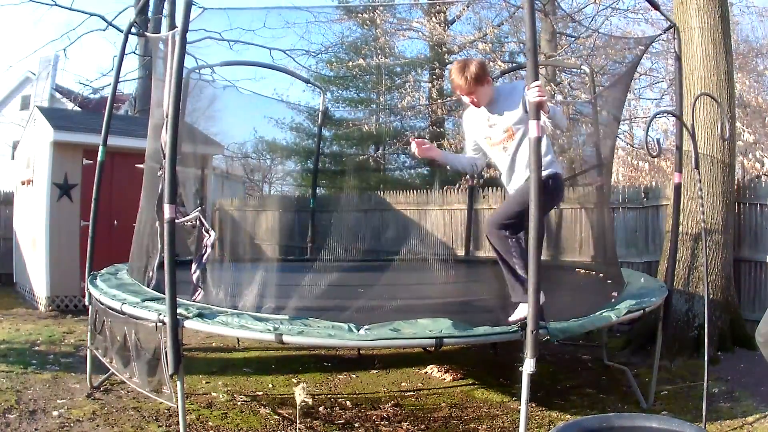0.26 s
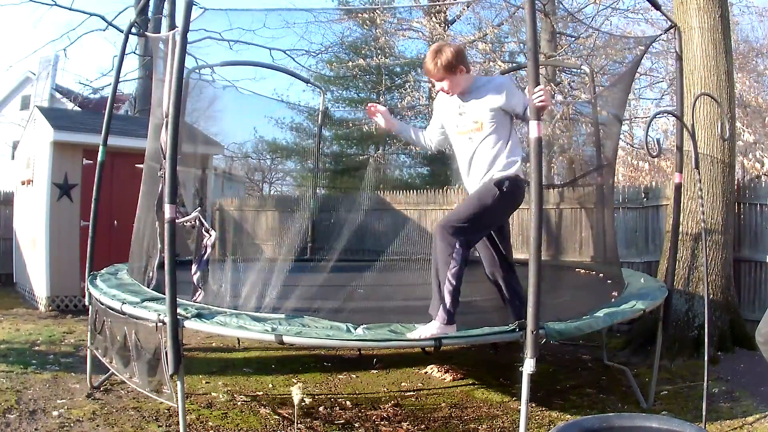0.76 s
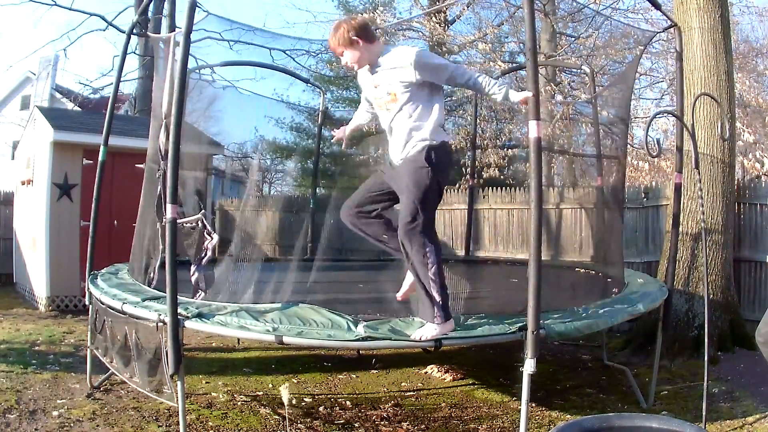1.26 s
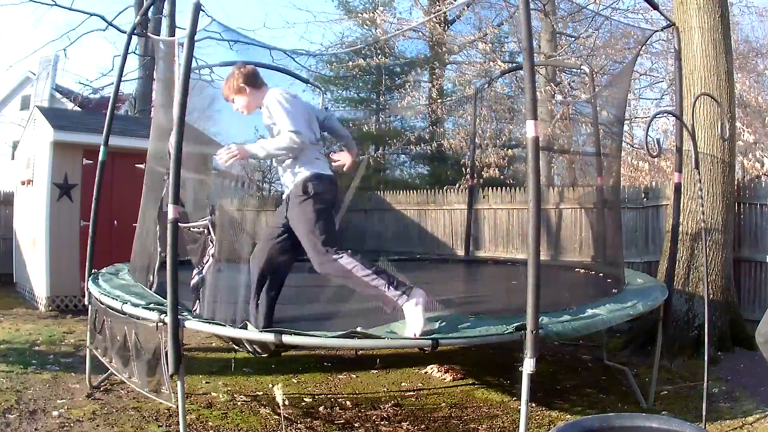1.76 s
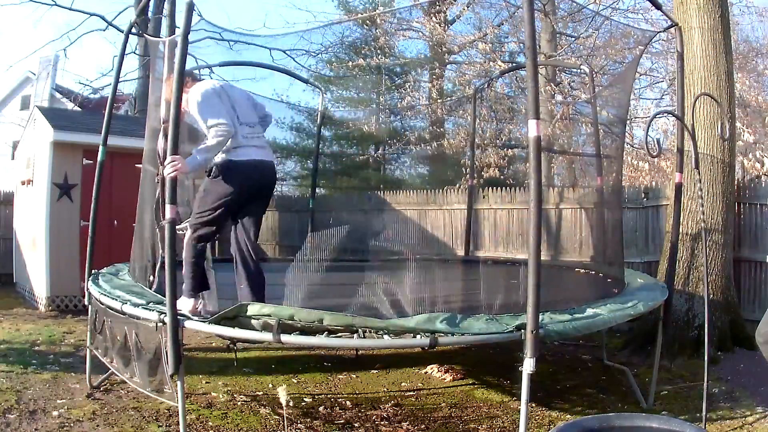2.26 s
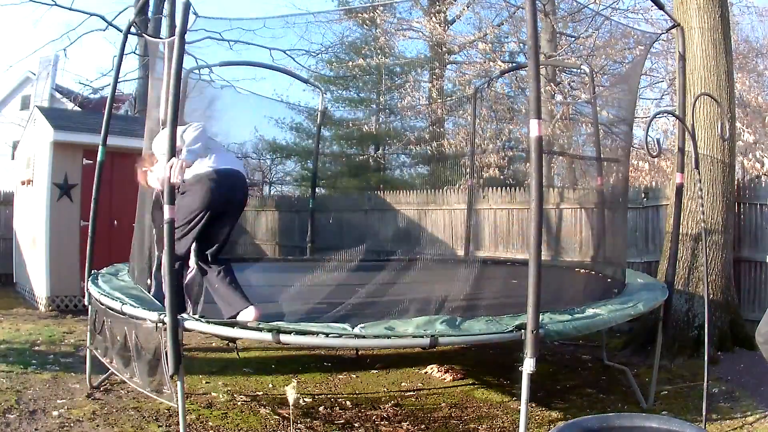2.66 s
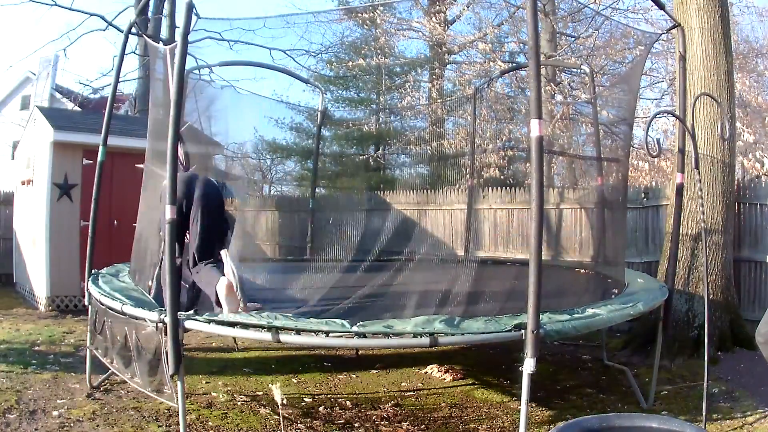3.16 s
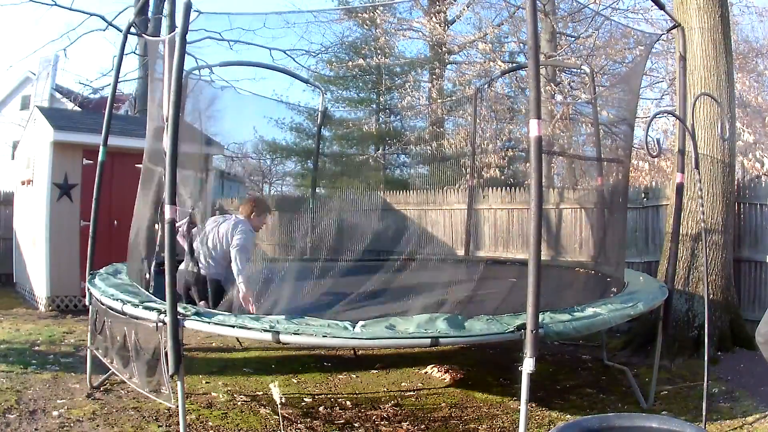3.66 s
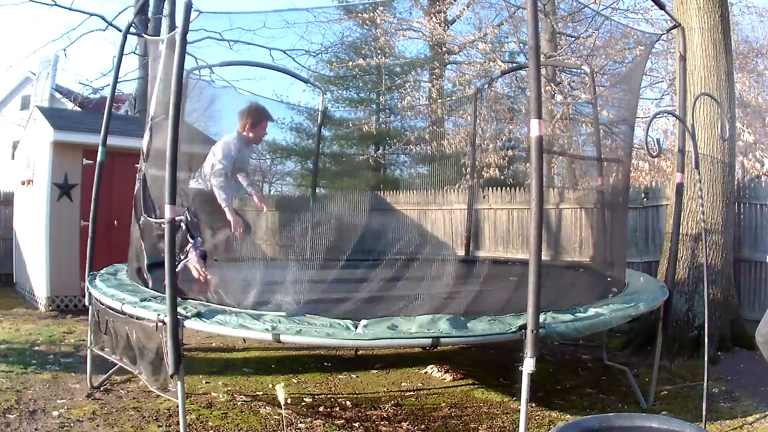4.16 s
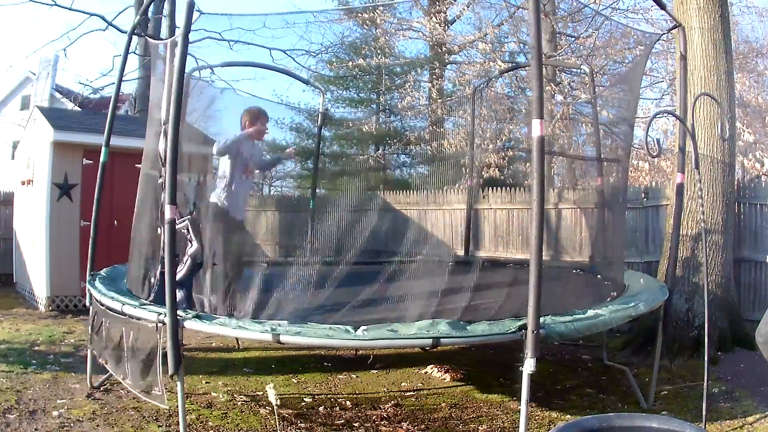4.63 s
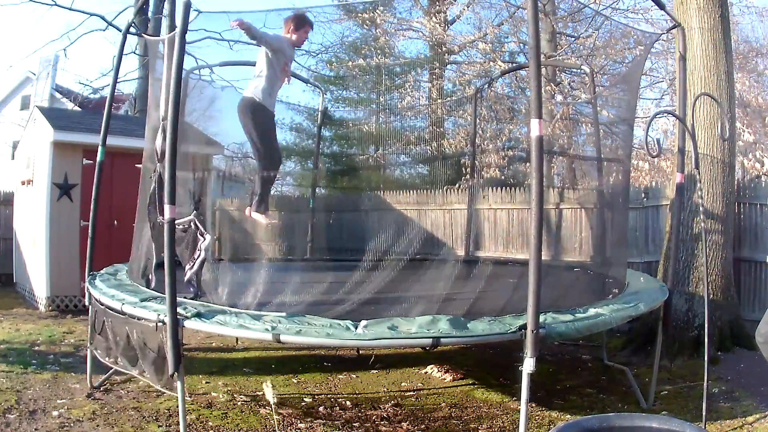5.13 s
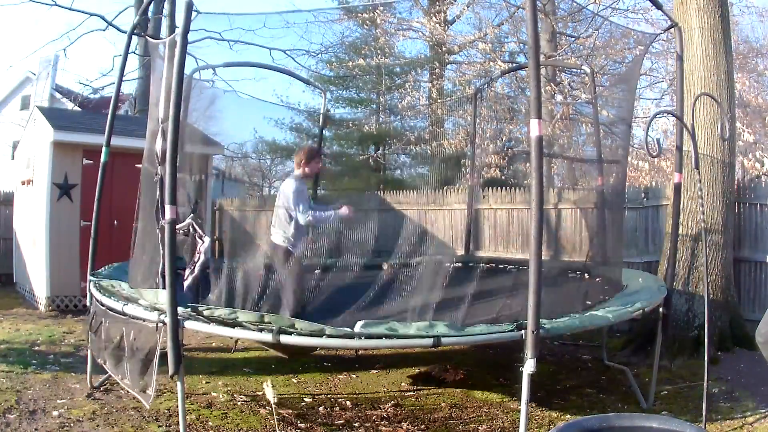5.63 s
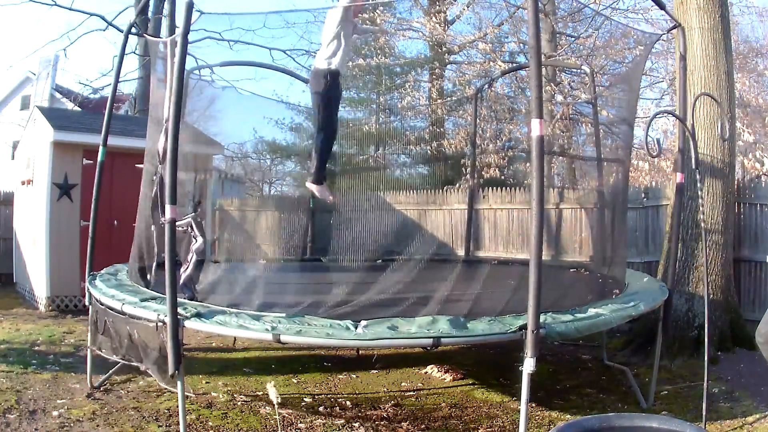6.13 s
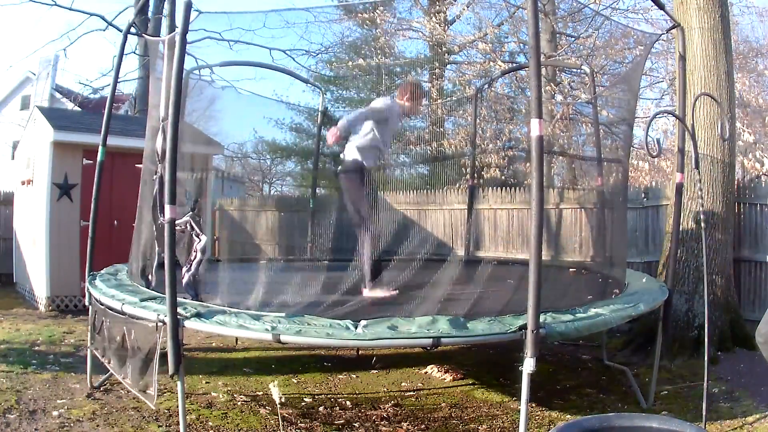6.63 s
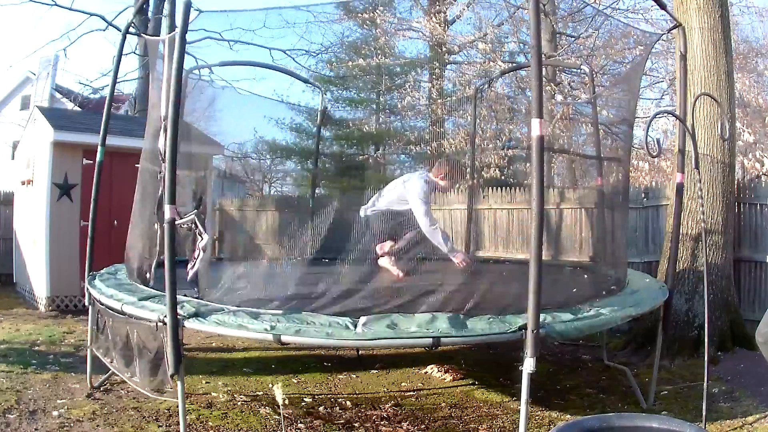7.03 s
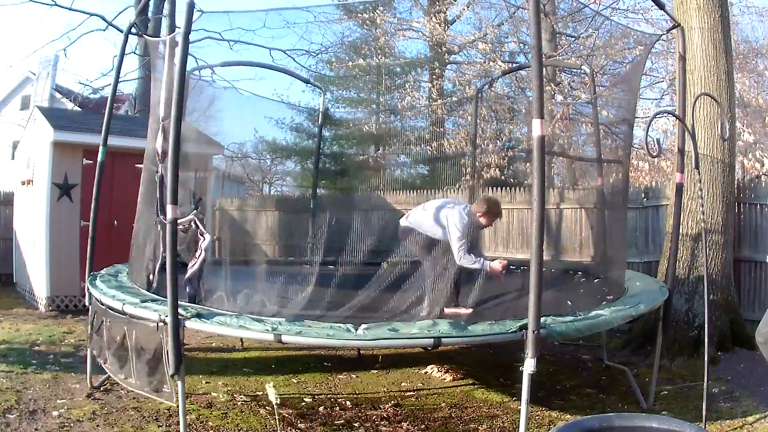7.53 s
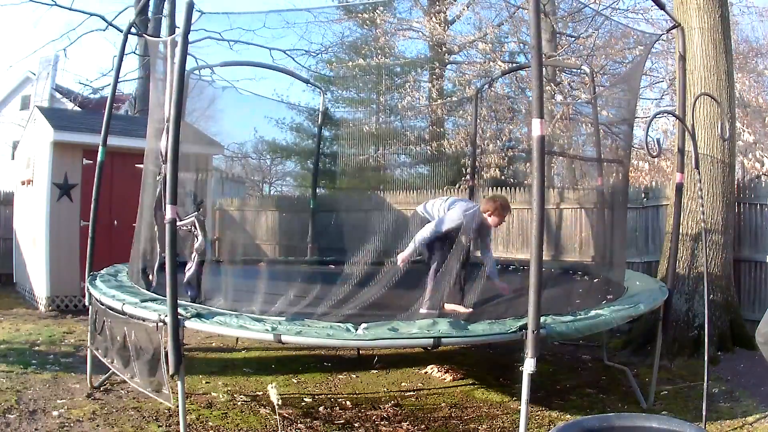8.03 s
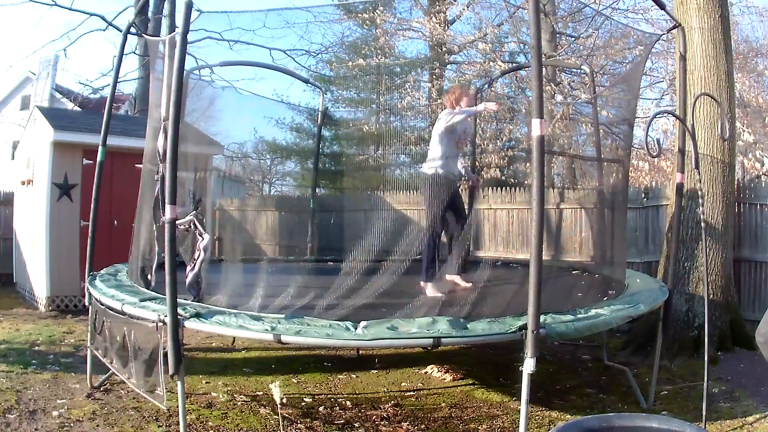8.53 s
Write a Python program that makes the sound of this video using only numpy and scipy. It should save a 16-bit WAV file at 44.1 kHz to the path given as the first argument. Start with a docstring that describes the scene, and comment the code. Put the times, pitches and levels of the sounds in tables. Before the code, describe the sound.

Steel hooks scrape, tick and crack on a trampoline outdoors, heard in mono from a few metres away. Sparse, thin creaking comes first, then a ringing tube knock with a cluster of snaps, further tugs, and rhythmic bouncing with raspy springs, tiny squeaks and muffled mat booms. Short pauses separate the bounces. Near the end there is only faint creaking and a couple of small clicks over quiet air and scattered echoes.

```python
"""Spring hooks grind, snap and squeak on a backyard trampoline: someone steps along the rim, climbs in and bounces.
Uneven trains of short noise ticks make the grinding; cracks with chatter make the snaps, gliding harmonics the squeaks.
Sine tones make the knocks of the steel tubes and, with a puff of filtered noise, the soft thumps of the mat.
Fence and shed throw short echoes, made of scattered clicks, over a quiet outdoor hush of filtered noise, all in mono."""
import sys
import numpy as np
from scipy import signal
from scipy.fft import rfft, irfft, next_fast_len
from scipy.io import wavfile
from scipy.ndimage import uniform_filter1d

SR = 44100
rng = np.random.default_rng(int(sys.argv[2]) if len(sys.argv) > 2 else 0)


def transcribe(u):
    """Save the signal u as a 16-bit wav file named by the first command-line argument.

    u: samples, shape (n,) or (channels, n), limited to [-1, 1]; the rate is SR.
    q: integer samples, one column per channel.
    """
    v = np.clip(np.atleast_2d(u).T, -1, 1)
    q = np.round(v * 32767).astype(np.int16)
    wavfile.write(sys.argv[1], SR, q)


N = 387638  # length of the scene [samples]

# Colour of steel rubbing on steel: (frequency [Hz], relative level [dB])
RUBBING_COLOUR = [(100, -45), (300, -32), (650, -27.5), (900, -16), (1250, -9), (1600, 1.5), (2100, 2.5),
                  (2800, -0.5), (3400, -1), (4300, 0), (5300, -4.5), (6600, -1), (7400, -8), (8500, -4),
                  (9500, -0.5)]
PATCH_DB = 1.8  # spread of the wandering resonances [dB]


def amp(db):
    """Turns decibels into a gain."""
    return 10 ** (np.asarray(db) / 20)


def evened(x):
    """Scales a signal to an average strength (rms) of 1."""
    return x / np.sqrt(np.mean(x ** 2) + 1e-20)


def read(points, hz):
    """Reads a table between its points, along a logarithmic frequency axis."""
    f, value = np.transpose(points)
    return np.interp(np.log(hz + 1), np.log(f + 1), value)


def add(mix, s, sound):
    """Mixes a sound in, starting at a time in seconds."""
    part = mix[max(round(s * SR), 0):][:len(sound)]
    part += sound[:len(part)]


def colour(x, points):
    """Makes some frequencies louder or softer, as a table of levels says."""
    size = next_fast_len(len(x) + 1024)
    gain = amp(read(points, np.fft.rfftfreq(size, 1 / SR)))
    return irfft(rfft(x, size) * gain, size)[:len(x)]


def halves(x):
    """Splits a sound at 3800 Hz into its middle, with all that lies below, and its treble."""
    low_pass = signal.butter(6, 3800, fs=SR, output="sos")
    middle = signal.sosfiltfilt(low_pass, x)
    return middle, x - middle


def drift(per_s, size=N):
    """Wanders at random around 0: straight lines join per_s random values a second."""
    knots = rng.standard_normal(8192)
    return np.interp(np.arange(size) / SR * per_s, np.arange(len(knots)), knots)


def patchy(x, depth_db):
    """The resonances of the moving coils wander: patches some 200 Hz wide and 40 ms long."""
    z = signal.stft(x, nperseg=512, noverlap=384)[2]
    field = uniform_filter1d(rng.standard_normal(z.shape), size=3, axis=0)  # smooth over frequency
    field = evened(uniform_filter1d(field, size=16, axis=1))  # smooth over time
    return signal.istft(z * amp(depth_db * field), nperseg=512, noverlap=384)[1][:len(x)]


def hush(early_db=-50, late_db=-49.0, waver_db=1.0):
    """Far rumble and airy hiss of the neighbourhood: coloured noise whose level wavers."""
    # Colour of the quiet outdoors: (frequency [Hz], relative level [dB per Hz])
    hush_colour = [(12, -21.5), (22, 2.5), (110, -3.5), (170, -10.5), (300, -14.5), (520, -17.5),
                   (1050, -12.5), (1700, -7), (2500, -15), (4500, -21.5), (6500, -15.5), (7500, -20),
                   (8600, -10.5), (9500, -18)]
    air = evened(colour(rng.standard_normal(N), hush_colour))
    level_db = np.linspace(early_db, late_db, N) + waver_db * drift(26)
    return air * amp(level_db)


def yard(x, wet_db=-11, build_s=0.004):
    """Ground, fence, shed and trees throw scattered echoes that die away at a different speed in each pitch range."""
    # How long the echoes last: (frequency [Hz], time to fall by 60 dB [s])
    echo_times = [(200, 0.12), (2000, 0.97), (9000, 0.53)]
    # about 2500 echoes a second at random moments, with random sign
    taps = rng.choice([-1., 1.], SR // 2) * (rng.random(SR // 2) < 2500 / SR)
    hz, t, z = signal.stft(taps, SR, nperseg=256)
    fading = amp(-60 * t / read(echo_times, hz)[:, None])
    build_up = np.minimum(t / build_s, 1)
    tail = signal.istft(z * fading * build_up, SR, nperseg=256)[1]
    echoes = signal.oaconvolve(x, tail / np.linalg.norm(tail))[:N]
    return x + amp(wet_db) * echoes


def mat(rise_s=0.012, cloth_t60=0.65, sway=.08):
    """The stretched mat booms softly, its pitch swaying with the tension; its cloth gives a dull puff."""
    # The mat takes the weight, higher in pitch near the rim: (time [s], level [dB], pitch [Hz],
    # time for the boom to fall by 60 dB [s], cloth puff relative to the boom [dB])
    thumps = [(1.9, -61, 114, 0.31, 8), (2.119, -47.5, 113, 0.7, -20), (3.061, -48, 112, 0.34, -19),
              (3.82, -46.5, 106.3, 0.44, -15), (4.898, -49, 110, 0.46, -20), (5.817, -38, 78, 0.76, -12),
              (7.05, -36.5, 82.2, 1, -10)]
    # Ways the mat swings, like a drum skin: (multiple of the pitch, level [dB])
    drum_modes = [(1, -5), (.77, -11.5), (1.44, -15)]
    # frequency [Hz], relative level [dB]
    cloth_colour = [(30, -30), (90, -10), (250, -12.5), (600, -5), (1000, -4.0), (2500, -27.5)]
    t, out = np.arange(SR) / SR, np.zeros(N)
    for s, db, hz, t60, cloth_db in thumps:
        turns = hz * np.cumsum(1 + sway * drift(25, SR)) / SR
        drum = sum(amp(mode_db) * np.sin(2 * np.pi * (k * turns + rng.random())) for k, mode_db in drum_modes)
        puff = evened(colour(rng.standard_normal(SR), cloth_colour))
        boom = drum * amp(-60 * t / t60)
        cloth = puff * amp(cloth_db - 60 * t / cloth_t60)
        add(out, s, amp(db) * np.minimum(t / rise_s, 1) * (boom + cloth))
    return out


def knocks(rise_s=.001):
    """A tube shifts in its joint with a blip of a few cycles, or rings briefly when free."""
    # The steel tubes knock: (time [s], level [dB], pitch [Hz], time to fall by 60 dB [s])
    tube_knocks = [(1.902, -26.5, 2190, 0.18), (1.912, -29, 2346, 0.14), (1.915, -29, 6000, 0.17),
                   (4.036, -18, 1930, 0.016), (5.8623, -12, 1700, 0.008)]
    t, out = np.arange(SR // 3) / SR, np.zeros(N)
    for s, db, hz, t60 in tube_knocks:
        shape = np.minimum(t / rise_s, amp(-60 * (t - rise_s) / t60))
        add(out, s, amp(db) * shape * np.sin(2 * np.pi * hz * t))
    return out


def steel(x):
    """The coils and frame ring on faintly after every slip, each resonance as a fading tone."""
    # Resonances of coils and frame: (pitch [Hz], relative level [dB], time to fall by 60 dB [s])
    resonances = [(1383, -4, .1), (1604, -3, .08), (2180, -2, .1), (2878, -5, .07), (3387, -4, .08),
                  (3600, -4, .07), (3836, -4, .07), (4280, -3, .09), (4767, -4, .14), (5383, -4, .06),
                  (6000, -4, .1), (6500, -2, .08), (7425, -3, .18), (8980, -3, .1), (9455, -2, .1)]
    t = np.arange(SR // 2) / SR
    ring = sum(amp(db - 60 * t / t60) * np.sin(2 * np.pi * hz * t) for hz, db, t60 in resonances)
    ringing = signal.oaconvolve(x, ring / np.linalg.norm(ring))[:N]
    return x + amp(-15) * ringing


def squeaks(grind, radiate_hz=1300, shimmer_db=3):
    """Even slipping takes over from the grinding, dipped to half, as a short gliding stack of harmonics."""
    # A hook slips evenly and sings: (time [s], length [s], first pitch [Hz], last pitch [Hz],
    # level [dB], overtone slope [dB per octave], pitch roughness [share of the pitch])
    songs = [(0.271, 0.076, 1800, 1898, -46, -22, .11), (2.532, 0.027, 1630, 1700, -41, -25, .04),
             (4.63, 0.042, 679, 728, -31.5, 0, 0.016), (4.675, 0.049, 711, 724, -35.5, 0, 0.02),
             (4.696, 0.028, 1124, 1077, -34.5, -13.5, 0.057), (4.834, 0.031, 1360, 1633, -35, -5.5, 0.071),
             (4.87, 0.032, 1950, 1940, -36, -8, 0.055), (5.674, 0.036, 1990, 1920, -40.5, -6.5, 0.028),
             (5.924, 0.015, 1427, 1470, -29.5, -6, 0.023)]
    out, singing = np.zeros(N), np.zeros(N)
    for s, length, first_hz, last_hz, db, slope_db, rough in songs:
        size = int(length * SR)
        hz = np.linspace(first_hz, last_hz, size) * (1 + rough * drift(700, size))
        turns = np.cumsum(hz) / SR
        k = np.arange(1, 9)[:, None]  # harmonic numbers
        sloped = amp(read(RUBBING_COLOUR, k * hz) + slope_db * np.log2(k))
        # thin steel hardly radiates the low harmonics
        weight = sloped / (1 + (radiate_hz / (k * hz)) ** 6)
        stack = (weight * np.sin(2 * np.pi * (k * turns + rng.random(k.shape)))).sum(0)
        grip = amp(shimmer_db * drift(400, size))
        swell = signal.windows.tukey(size, .5)
        add(out, s, amp(db) * evened(stack * grip) * swell)
        add(singing, s, swell)
    return out + grind * (1 - np.minimum(singing, 1) / 2)


def snaps(grain_db=1.5, crack_db=10, crack_t60=0.04, coil_t60=.085, rise_s=.0024, level_db=-12):
    """A hook jumps in its seat: a bright crack, then the coil chatters to rest."""
    # Each jump: (time of the middle of the rise [s], level before level_db is added [dB],
    # loudness of the crack before crack_db is added [dB])
    jumps = [(0.1952, -31, 11), (.609, -26.5, -32), (.6387, -20, -34), (1.1747, -27, -3),
             (1.3547, -20.5, -2.5), (1.4827, -21, -5), (1.519, -33, 8), (1.668, -32, 15),
             (1.7518, -21, 4.5), (1.7904, -22.5, 8), (1.9, -10, -6.5), (1.9126, -13.5, 3.5),
             (2.0248, -14, -30), (2.0403, -22, -28), (2.068, -15.5, -35), (2.1128, -13, -7),
             (2.172, -19.5, -1.5), (2.6623, -12.5, -15), (2.6985, -17, -3), (3.0184, -17.5, -9),
             (3.1416, -17.5, -29), (3.3688, -15.5, 2), (3.881, -15.5, -8.5), (4.357, -16.5, -12),
             (4.4252, -17.5, -1.5), (4.4688, -16.5, -5.5), (5.1047, -22, -6), (5.174, -25, 7.5),
             (5.648, -28.5, -7), (6.1665, -22, 5.5), (6.2135, -25, 5), (6.6671, -22, -28),
             (7.0762, -6.5, -21), (7.1186, -20, 2), (7.4851, -13, -26), (8.5417, -29, -29),
             (8.7068, -17, -5)]
    # Colour of a hook's first jump: (frequency [Hz], relative level [dB])
    crack_colour = [(300, -44), (1500, -25), (3000, -10.5), (6000, 0), (7500, 0.5), (8600, 8.5),
                    (9500, 5.5)]
    t, out = np.arange(SR // 3) / SR, np.zeros(N)
    for s, db, bright_db in jumps:
        grain = amp(grain_db * drift(1200, len(t)))
        chatter = patchy(rng.standard_normal(len(t)), PATCH_DB) * grain
        coil = evened(colour(chatter, RUBBING_COLOUR)) * amp(-60 * t / coil_t60)
        crack = evened(colour(chatter, crack_colour)) * amp(bright_db + crack_db - 60 * t / crack_t60)
        rise = np.minimum(t / rise_s, 1)
        add(out, s - rise_s / 2, amp(db + level_db) * rise * (coil + crack))
    return out


def pulls(recoil_rise_s=0.042, recoil_hold_s=0.031, rebound_s=0.27):
    """Lists every pull on the springs: a bounce is stretch, recoil and rebound; a tug is one pull."""
    # A step or a shift of weight tugs at a few springs: (time [s], rise [s], hold [s],
    # relative grinding level [dB], treble relative to it [dB])
    tugs = [(0.0, 0.0039, 0.028, -48, 3), (.195, 0.013, 0.07, -47.5, 11), (.26, 0.037, .05, -46.5, -2),
            (.7, 0.033, 0.55, -57.5, 8), (1.155, 0.018, 0.022, -40.5, 10.5), (1.33, 0.019, .02, -42.5, 4),
            (1.42, 0.064, 0.0075, -47, 16), (1.65, 0.0086, 0.05, -47, 10), (1.8, 0.036, 0.044, -43, 4.5),
            (1.9, 0.011, .006, -29.5, 1), (2.02, 0.0072, 0.018, -39.5, 1), (2.12, 0.058, 0.031, -41.5, 8),
            (2.46, 0.051, 0.032, -43, 10), (2.58, .03, .05, -46.5, -1), (2.665, 0.077, 0.014, -33.5, 6),
            (2.97, 0.026, 0.0046, -41.5, 9.5), (3.137, 0.0066, 0.026, -31.5, 2),
            (3.32, 0.057, 0.03, -35, 9.5), (3.42, 0.042, .04, -36, 1.5), (3.56, 0.016, 0.097, -40, 7.5),
            (4.09, 0.038, 0.16, -44, 7), (4.425, .008, 0.047, -50.5, 0), (4.83, 0.011, .04, -36.5, -8),
            (5.02, .03, .08, -46, 5), (5.86, 0.022, 0.043, -32.5, 4), (6.12, 0.048, .02, -41.5, 9.5),
            (6.4, 0.0096, 0.0088, -47, 4), (7.073, 0.0054, 0.032, -28, 2.5), (7.24, 0.027, .015, -35, 9.5),
            (7.37, 0.032, 0.041, -40, 5), (7.55, 0.017, 0.11, -48.5, 7.5), (8.13, 0.017, .005, -54, 6),
            (8.707, .008, .01, -45, 6)]
    # A full bounce stretches the springs, they recoil, the empty mat rebounds: (time [s], rise [s],
    # hold [s], relative grinding level [dB], time until the recoil [s],
    # recoil relative to the stretch [dB], rebound relative to the recoil [dB])
    bounces = [(3.848, 0.13, 0.048, -31, 0.29, -10.5, -10), (4.61, 0.015, 0.1, -33, 0.27, -4, -1),
               (5.674, 0.13, 0.025, -26.5, 0.26, -4.5, -6.5),
               (6.87, 0.12, 0.048, -30.5, 0.2913, -2.5, -6.5)]
    stretch_treble_db, recoil_treble_db, rebound_treble_db = 6, 11.5, 9
    rows = list(tugs)
    for s, rise, hold, db, wait, recoil_db, rebound_db in bounces:
        rows.append((s, rise, hold, db, stretch_treble_db))
        # the springs shorten again with a brighter rasp
        recoil_at, db = s + wait, db + recoil_db
        rows.append((recoil_at, recoil_rise_s, recoil_hold_s, db, recoil_treble_db))
        # the empty mat swings back once more, weaker
        db += rebound_db
        rows.append((recoil_at + rebound_s, recoil_rise_s, recoil_hold_s, db, rebound_treble_db))
    return rows


def load(release_t60=0.28, settle_db=-21.5, settle_t60=2.3):
    """Strength of the grinding in the middle and the treble: each pull rises, holds and lets go; their powers add."""
    t, power = np.arange(N)[:2 * SR] / SR, np.zeros((2, N))
    for s, rise, hold, db, treble_db in pulls():
        after = np.maximum(t - rise - hold, 0)
        # every pull dies away quickly, then the springs creak on faintly as the mat settles
        release = amp(-60 * after / release_t60)
        settling = amp(settle_db - 60 * after / settle_t60)
        swell = np.minimum(t / rise, 1) * (release + settling)
        add(power[0], s, (amp(db) * swell) ** 2)
        add(power[1], s, (amp(db + treble_db) * swell) ** 2)
    return np.sqrt(power)


def grinding(count=10, slip_hz=330, wander=.5, jitter=.12, turns_db=6, uneven_db=2.5, tick_t60=0.026, judder_db=2.3):
    """Hooks stick and slip in turns, each at its own wavering rate and with its own short ring."""
    t, slips = np.arange(2048) / SR, np.zeros(N)
    for _ in range(count):
        rate = slip_hz * np.exp(wander * drift(14) + jitter * drift(400))
        # one slip each time the summed rate passes a whole number
        slip = np.diff(np.floor(np.cumsum(rate) / SR), prepend=0)
        uneven = np.clip(rng.standard_normal(N), -2, 2)
        size = amp(turns_db * drift(22) + uneven_db * uneven)
        # noise with a sharp start and a longer ring
        tick = rng.standard_normal(len(t)) * (amp(-60 * t / tick_t60) + np.exp(-t / 0.00085))
        slips += signal.oaconvolve(slip * size, evened(tick))[:N]
    # the frame judders, so the grinding flutters in level
    slips = colour(patchy(slips, PATCH_DB), RUBBING_COLOUR) * amp(judder_db * drift(450))
    # the hooks share one load, so their sum is evened out and then follows the pull
    slips /= np.sqrt(abs(uniform_filter1d(slips ** 2, size=700)) + 1e-12)
    middle, treble = map(evened, halves(slips))
    middle_gain, treble_gain = load()
    return middle_gain * middle + treble_gain * treble


def scene(grind_db=-2.62):
    """Springs and mat in the yard, in mono: the same signal on both channels."""
    hooks = squeaks(amp(grind_db) * grinding()) + snaps()
    springs = steel(hooks) + knocks()
    mono = yard(springs) + mat() + hush()
    return np.array([mono, mono])


def record(dry):
    """A narrow notch in the treble, 7610 to 8200 Hz, as a recorder may have; nothing sounds above 9720 Hz."""
    taps = signal.firwin(601, [7610, 8200, 9720], window=("kaiser", 6), fs=SR)
    return signal.oaconvolve(dry, taps[None], "same")


dry = scene()
out = record(dry)
transcribe(out)
```